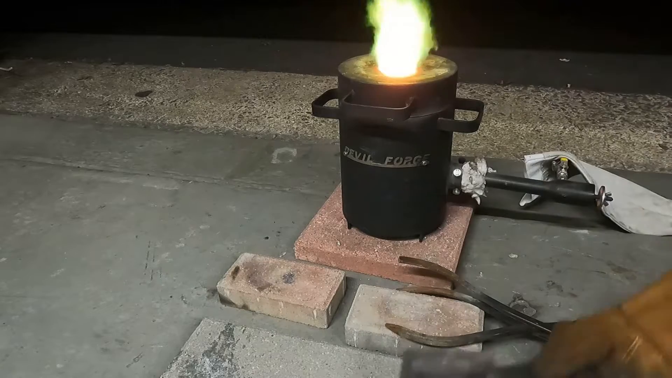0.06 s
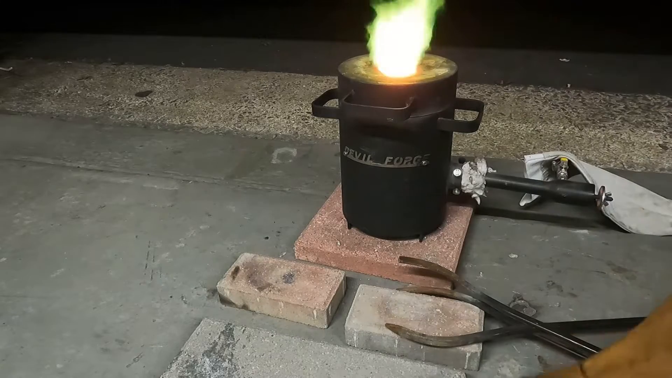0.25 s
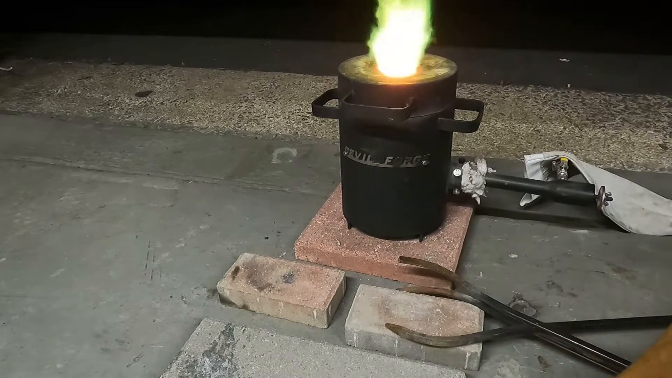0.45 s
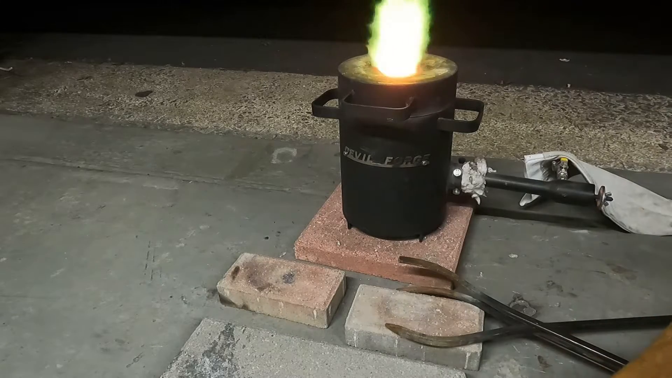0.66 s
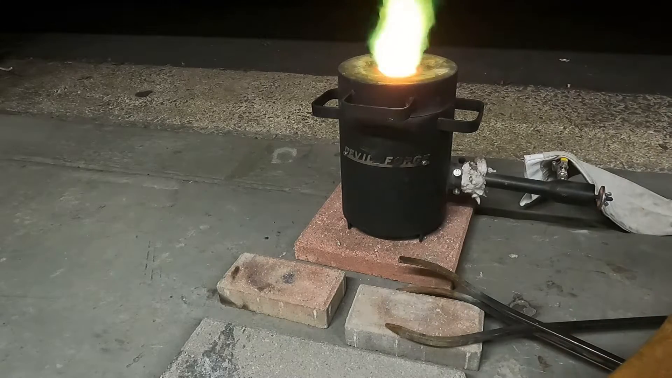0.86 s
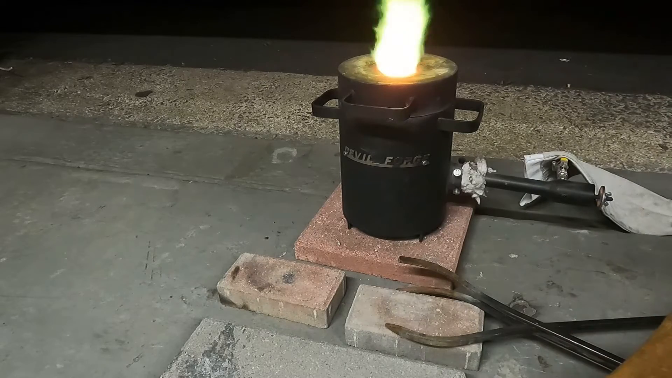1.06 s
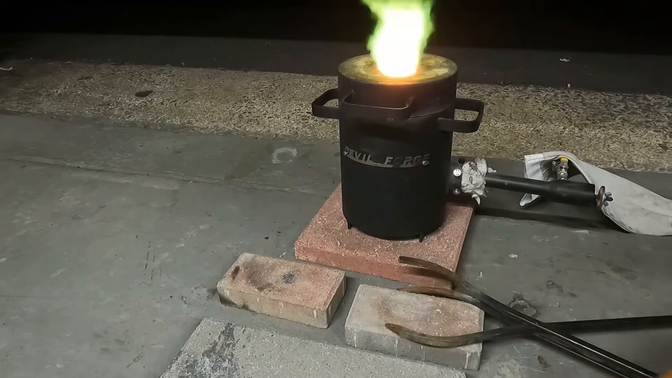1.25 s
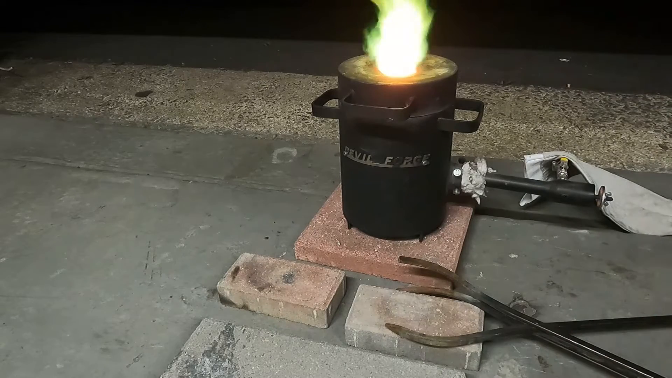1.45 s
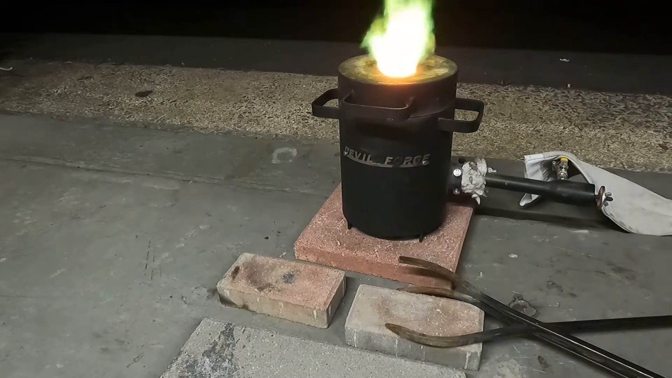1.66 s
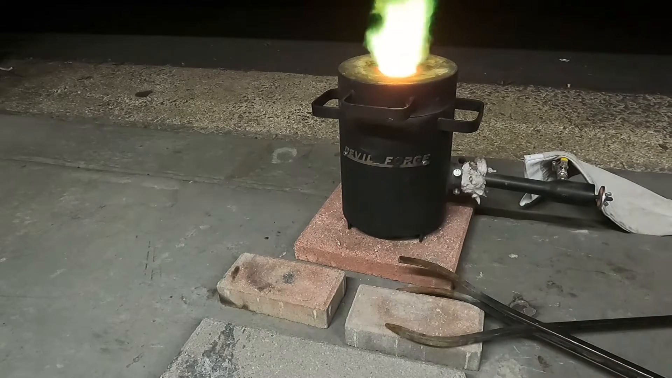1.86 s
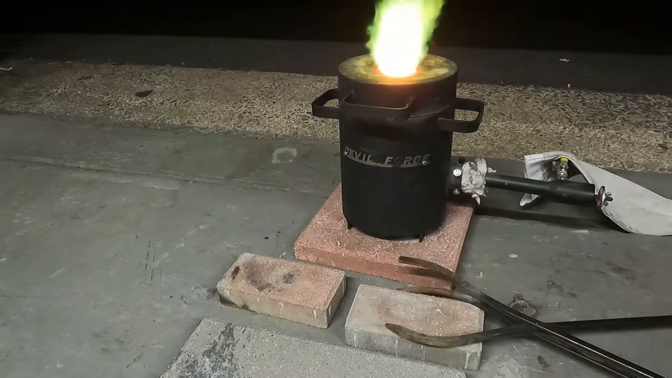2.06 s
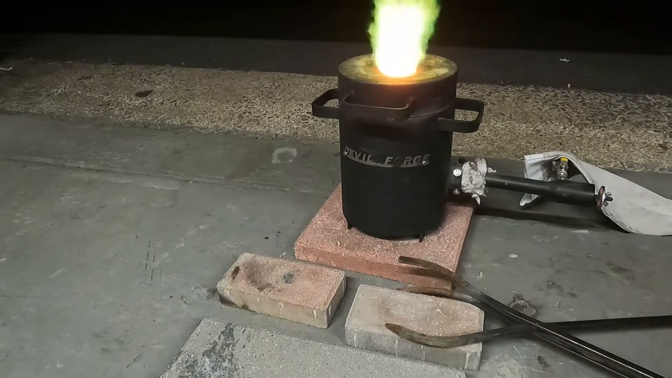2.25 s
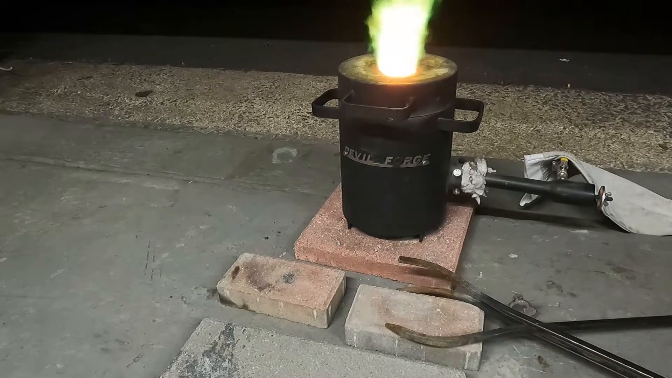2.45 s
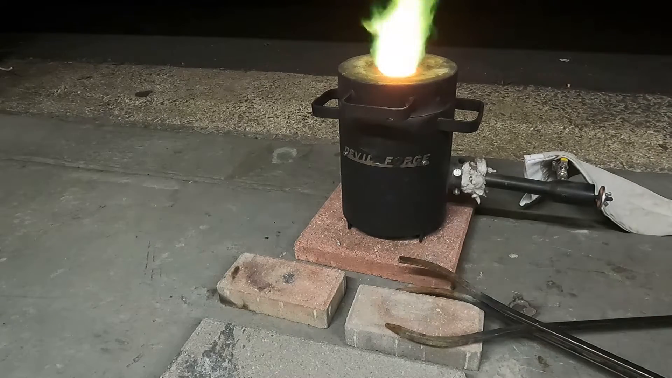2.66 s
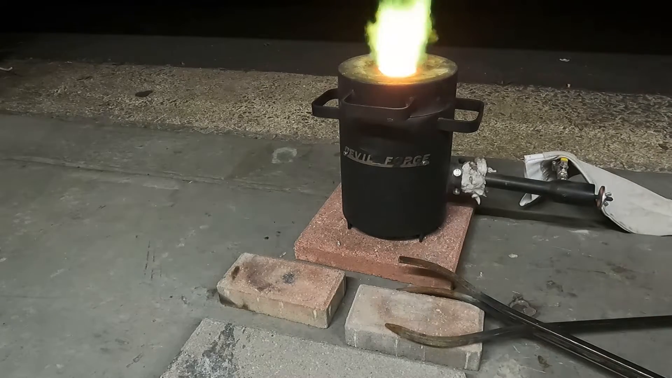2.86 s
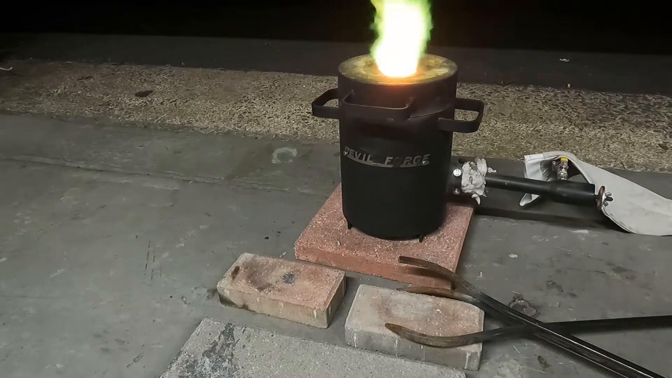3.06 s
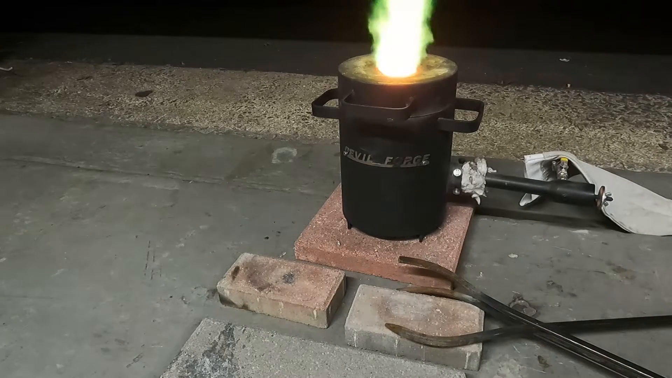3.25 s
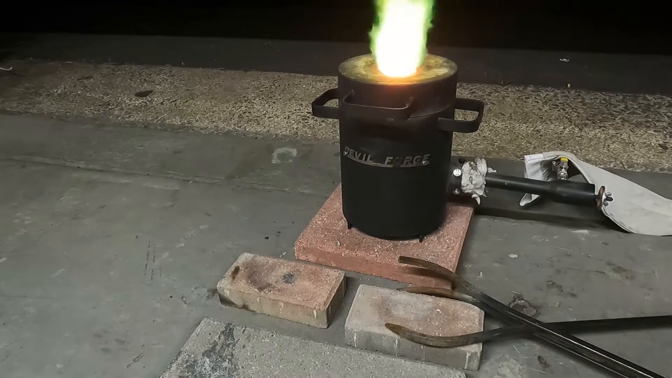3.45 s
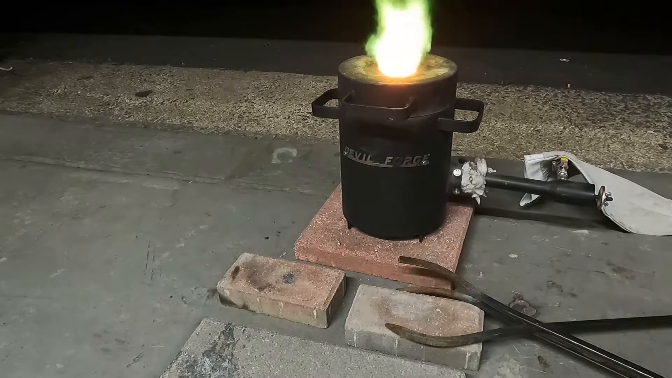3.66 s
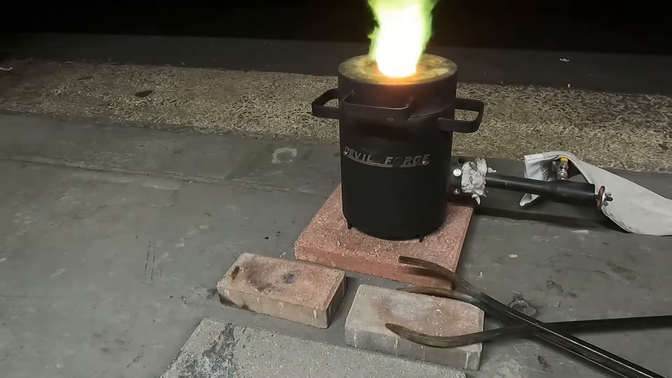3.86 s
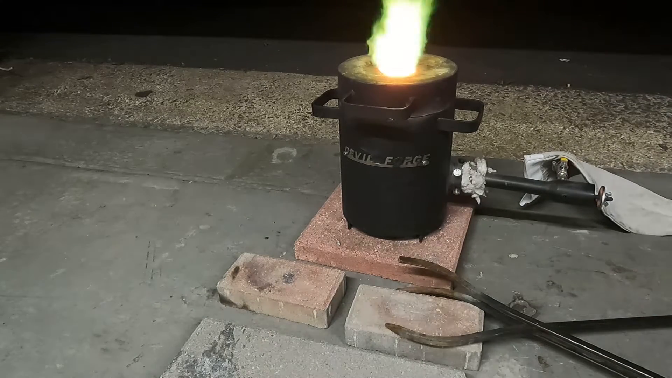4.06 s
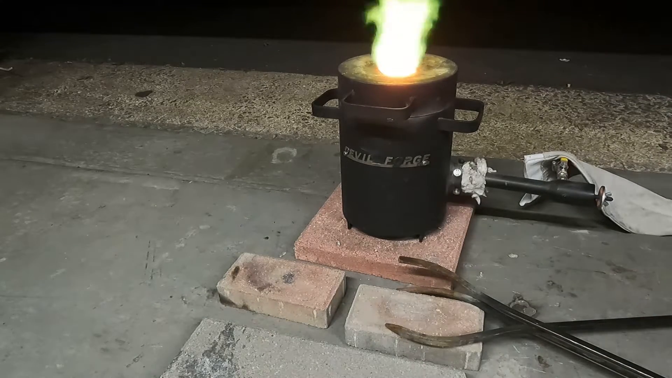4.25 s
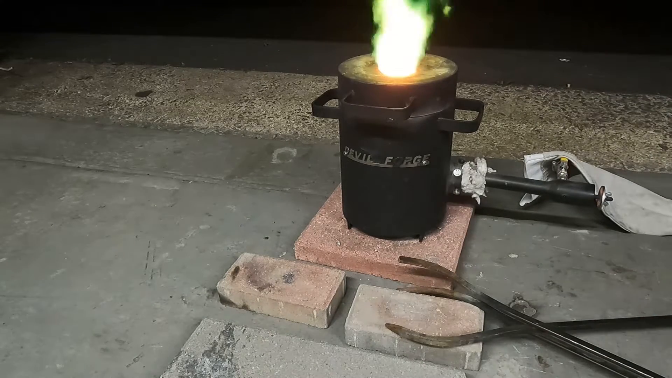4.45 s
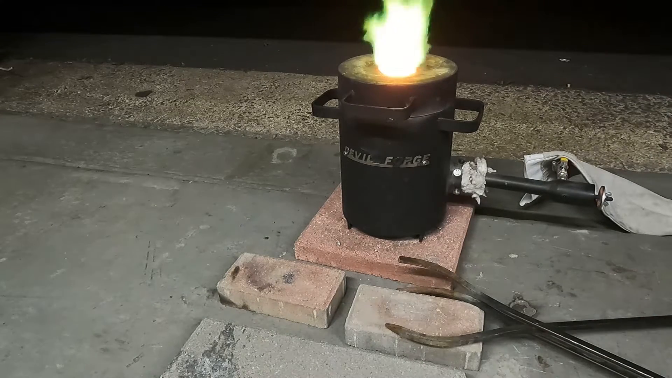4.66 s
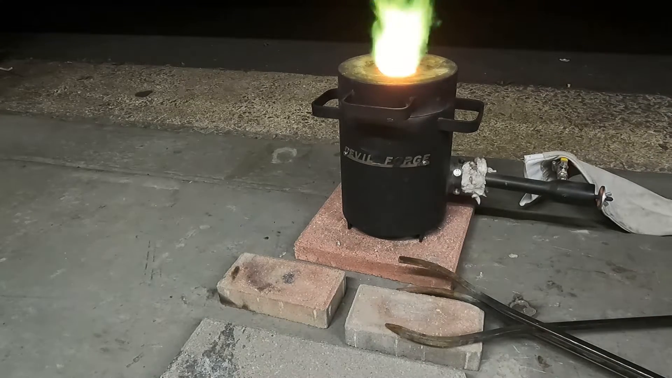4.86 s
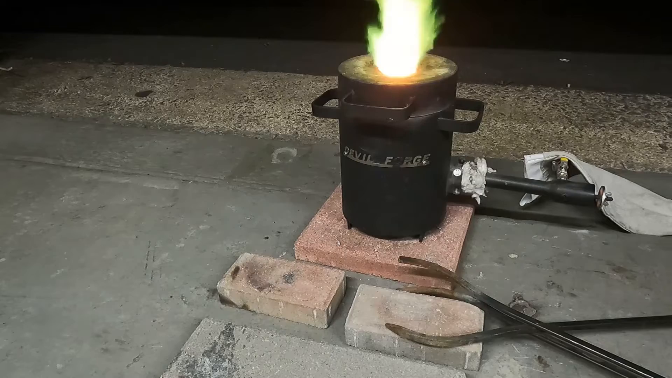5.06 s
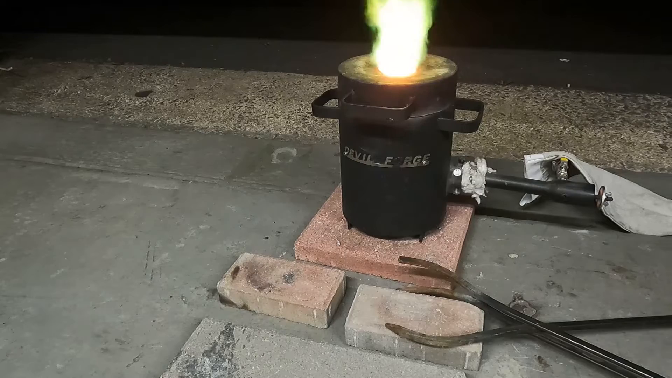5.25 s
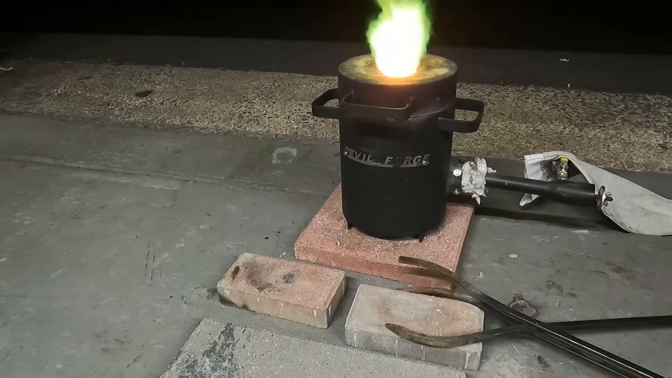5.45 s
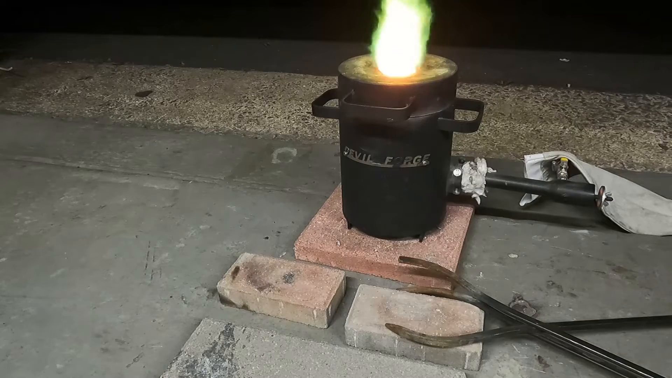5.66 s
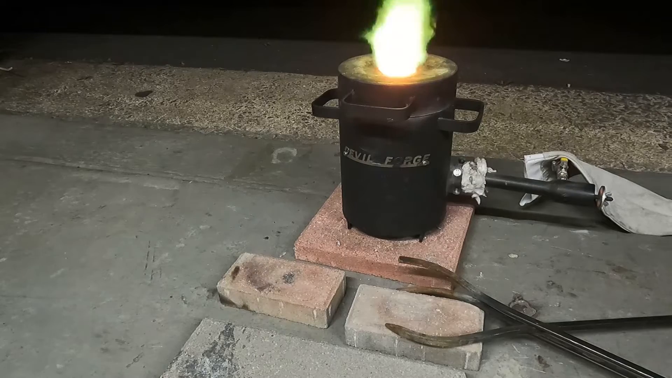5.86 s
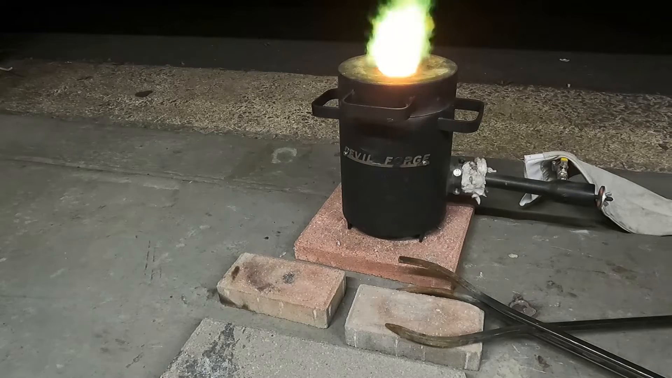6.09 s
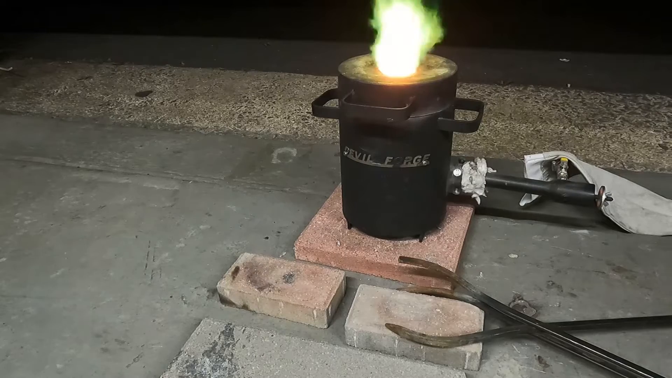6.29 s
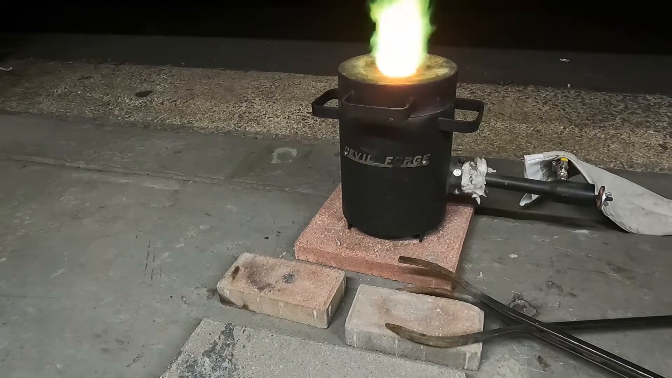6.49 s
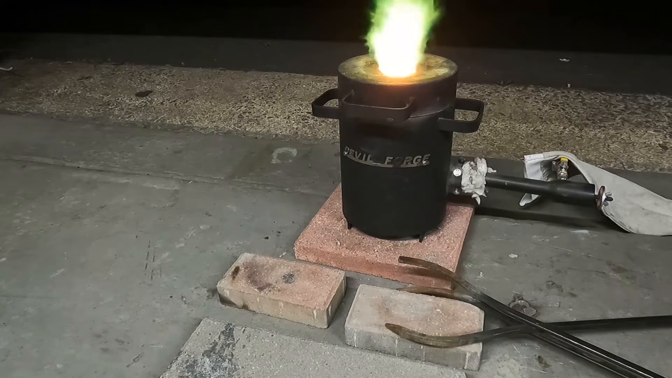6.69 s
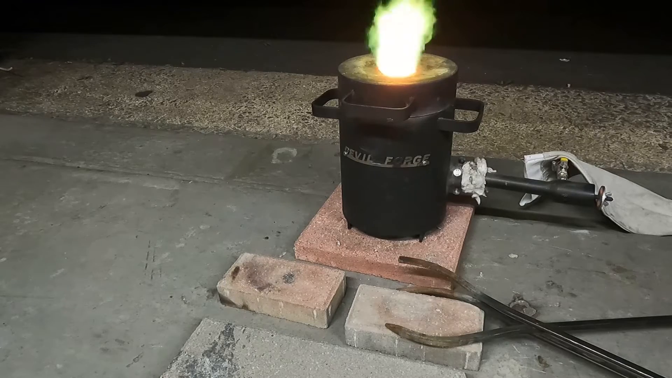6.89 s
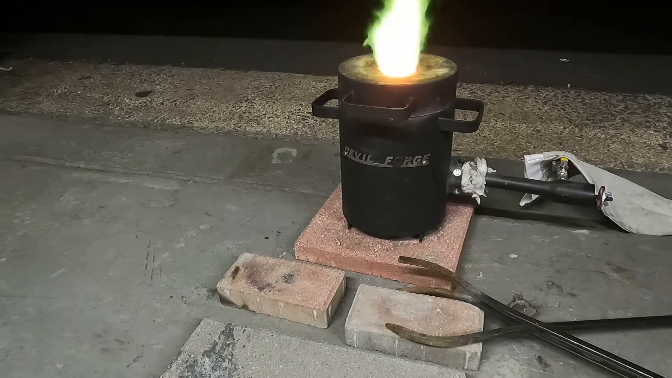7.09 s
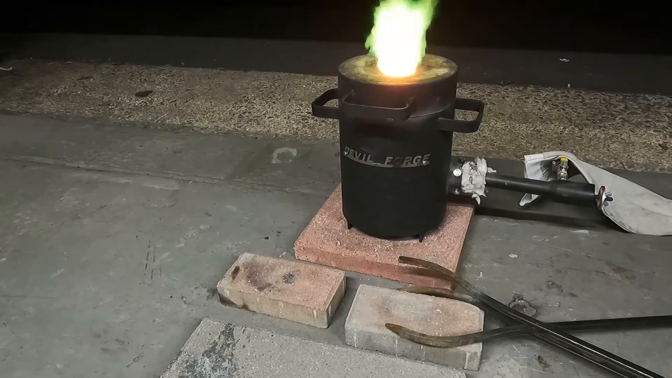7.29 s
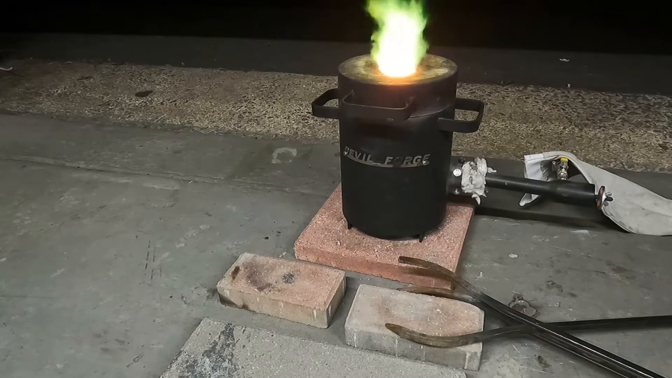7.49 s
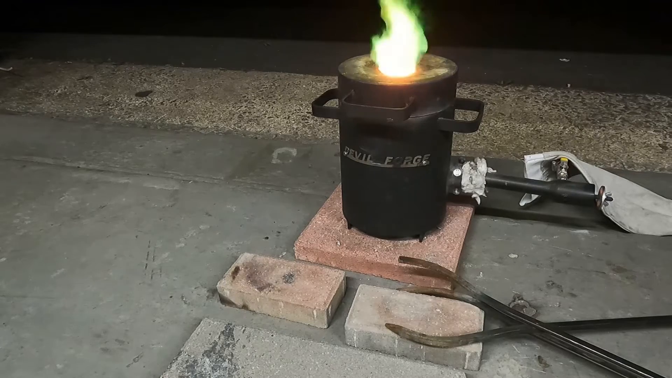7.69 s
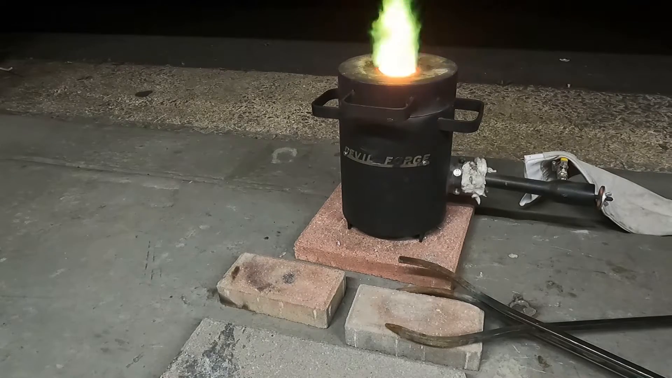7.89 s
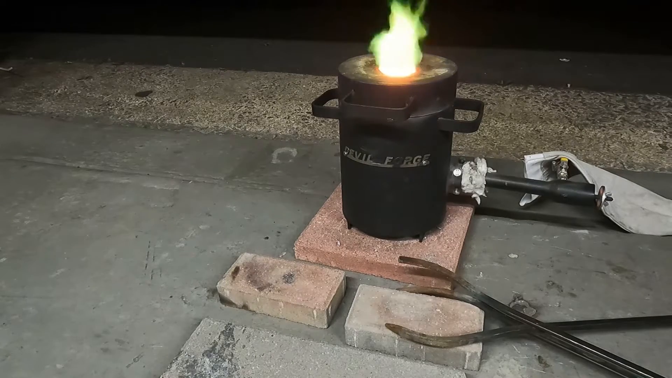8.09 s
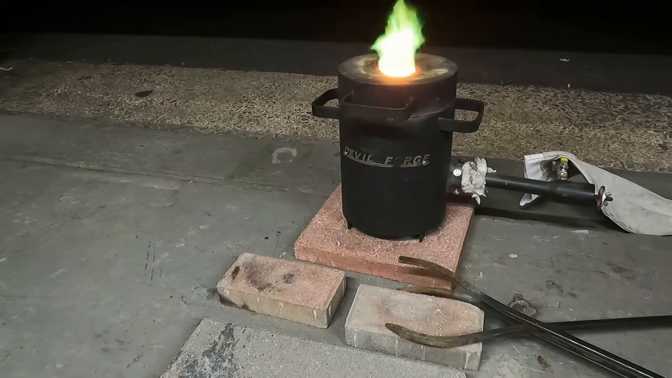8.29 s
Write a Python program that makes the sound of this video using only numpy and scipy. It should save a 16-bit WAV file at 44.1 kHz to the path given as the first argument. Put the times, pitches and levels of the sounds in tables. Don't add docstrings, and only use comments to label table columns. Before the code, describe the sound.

Low, booming gas-flame roar with faint hiss outdoors; a quick metallic knock at half a second, and the flame sinks in the last second.

```python
import sys
import numpy as np
from scipy import signal
from scipy.fft import rfft, irfft, next_fast_len
from scipy.io import wavfile
from scipy.ndimage import uniform_filter1d, minimum_filter1d, map_coordinates

SR = 44100
rng = np.random.default_rng(int(sys.argv[2]) if len(sys.argv) > 2 else 0)


def store_pcm(level_fs):
    pcm = np.round(np.clip(level_fs, -1, 1) * 32767).astype(np.int16)
    wavfile.write(sys.argv[1], SR, np.atleast_2d(pcm).T)


def to_linear_factor(level_db):
    exponent = np.asarray(level_db, float) / 20
    return 10 ** exponent


N = 367353

# frequency in Hz, level in dB per Hz.
RUMBLE_COLOUR = [(12, -48), (25, -31), (38, -18.5), (53, -13.5), (75, -6.5), (100, 2), (118, -5.5),
                 (150, -33), (300, -95)]
ROAR_COLOUR = [(60, -71), (100, -36), (130, -2.5), (160, -3), (190, -5.5), (225, -18.5), (300, -69),
               (600, -110)]
BOOM_COLOUR = [(100, -75), (160, -26), (190, -5), (220, 1), (255, 0), (335, -1.5), (365, -12), (450, -39.5),
               (900, -100)]
RUSH_COLOUR = [(200, -66), (330, -16), (380, 0), (450, -2), (600, -6), (800, -11.5), (1100, -14.5),
               (1500, -20.5), (1800, -25), (2000, -46), (2600, -74), (5000, -120)]
HISS_COLOUR = [(1120, -37), (1900, -9), (2000, -8), (2480, 0), (3040, -1), (3280, -10.5), (3940, -9),
               (4510, -0.5), (5150, -12.5), (5420, -15.5), (7030, -9), (8450, -20), (10000, -20),
               (11900, -18.5), (14100, -31)]
# centre in Hz, width in Hz, peak (or dip, if negative) in dB.
CHAMBER_MODES = [(119, 14, -4), (146, 14, 4), (170, 20, 4), (213, 14, -3), (259, 14, 3), (277, 16, -5),
                 (293, 14, 2), (308, 12, -2), (354, 12, -10), (376, 14, 4), (392, 9, -9), (410, 14, 3),
                 (487, 12, -7), (503, 12, 3), (514, 8, -4), (543, 12, -4), (559, 14, -6), (584, 20, 2),
                 (614, 12, 2), (666, 14, -7), (687, 10, -5), (747, 30, 3), (798, 30, -4), (917, 14, 4),
                 (935, 14, -4), (1190, 20, -4), (1264, 20, 5), (1317, 16, -5)]
TUBE_MODES = [(1990, 100, -4.5), (2453, 80, 5), (2730, 100, -3), (3580, 79, 7), (5075, 110, 5.5),
              (5100, 61, 6), (5280, 200, 6.5), (5720, 36, 8.5), (5930, 200, 6.5), (6710, 190, -6),
              (7700, 200, 2), (9000, 200, -1), (9800, 80, 7.5), (10010, 120, 6), (10600, 220, 2.5),
              (12200, 300, 1), (13500, 150, -8)]
# start in seconds, peak level in dB.
TOOL_CLICKS = [
    (.5353, -10),
]
# frequency in Hz, level in dB, time to fall 60 dB in seconds.
TOOL_MODES = [(880, -4, .022), (1150, -4, .016), (2300, -7, .018), (2900, -20, .01), (3560, -21, .035),
              (4310, -21, .015)]
# frequency in Hz, likeness from 0 to 1.
LIKENESS = [(125, 1), (250, 0.99), (500, 0.97), (1000, 0.95), (2000, 0.8), (3000, .74), (6000, 0.59),
            (10000, 0.28), (13600, .1)]
# frequency in Hz, lead of the left in radians.
LEFT_LEAD = [(30, 0), (60, -.04), (150, -.08), (400, -.15), (1290, -.4), (1980, -.5), (3010, -.8),
             (3700, -.6), (5430, -.2), (7840, -.1), (13800, 0)]
# frequency in Hz, left minus right in dB.
LEFT_TILT = [(200, 0), (670, -1), (1220, -1), (2240, -2.5), (4090, -1), (7470, -2.5), (13600, 3)]
# time in seconds, gas flow in dB.
GAS_FLOW = [
    (0, -32),
    (.6, -31),
    (3, -31.5),
    (6.3, -31.5),
    (7, -32),
    (7.35, -33.5),
    (7.7, -37),
    (8, -38),
    (8.33, -39),
]
# time in seconds, tip toward the upper chamber in dB.
FLAME_SEAT = [(0, 1), (.4, -2.5), (.8, -0.5), (1.25, -1), (1.5, 0.5), (1.85, -2.5), (1.96, 0.5), (2.3, -3),
              (2.7, 1), (3, -2), (3.6, 1.5), (4, -3), (4.7, 3), (5.2, -1.5), (5.7, 2), (6.5, 1), (7.3, 0),
              (8.33, 1)]
# frequency in Hz, readiness to stay wide in spreads.
WIDTH_KEPT = [(3000, 1.6), (5000, .7), (7500, -.2), (9500, -1.1), (11000, -1), (12000, -.1), (13000, -1.3)]

FULL_FLOW_DB = -31.5
RUMBLE_DB, RUMBLE_FOLLOWS = -27.5, 0.1
ROAR_DB, ROAR_FOLLOWS = -18, 0.57
BOOM_DB, BOOM_FOLLOWS = -17.5, 0.81
FLUTTER_S, FLUTTER_RISE_S, FLUTTER_DB = 8.1, 0.051, 4


def unit(x):
    return x / np.sqrt(np.mean(x ** 2) + 1e-20)


def along(points, hz):
    point_hz, values = np.transpose(points)
    return np.interp(np.log(hz + 1), np.log(point_hz + 1), values)


def wobble(rate_hz):
    knots = rng.standard_normal(int(N * rate_hz / SR) + 4)
    return map_coordinates(knots, [np.arange(N) * rate_hz / SR])


def filtered(x, response):
    size = next_fast_len(N + SR // 2)
    hz = np.fft.rfftfreq(size, 1 / SR)
    return irfft(rfft(x, size) * response(hz), size)[..., :N]


def resonances(modes, hz):
    return sum(db / (1 + (2 * (hz - centre_hz) / width_hz) ** 2) for centre_hz, width_hz, db in modes)


def walls(x):
    t = np.arange(SR // 10) / SR
    echoes = rng.standard_normal(len(t)) * to_linear_factor(-60 * t / 0.3) * (t > 0.004)
    echoes = to_linear_factor(-8.0) * echoes / np.linalg.norm(echoes)
    reflected = signal.fftconvolve(x, echoes[None], axes=1)[:, :N]

    def treble(hz):
        return hz ** 2 / (hz ** 2 + 900 ** 2) / (1 + hz / 6000)

    return x + filtered(reflected, treble)


def tool():
    out = np.zeros(N + SR)
    t = np.arange(SR // 4) / SR
    for start_s, peak_db in TOOL_CLICKS:
        pitch_hz = 2100 - 1000 * np.exp(-(t / 0.0018) ** 2)
        knock = to_linear_factor(-60 * t / 0.014) * np.sin(2 * np.pi * np.cumsum(pitch_hz) / SR)
        ring = sum(to_linear_factor(db - 60 * t / t60) * np.sin(2 * np.pi * hz * t) for hz, db, t60 in TOOL_MODES)
        blow = -(knock + ring) * (1 - np.exp(-t / 0.0008))
        yard = rng.standard_normal(len(t)) * to_linear_factor(-38 - 60 * t / 0.28) * (t > 0.004)
        answer = signal.fftconvolve(blow, yard)[:len(t)]
        out[round(start_s * SR):][:len(t)] += to_linear_factor(peak_db + 1) * (blow + answer)
    return out[:N]


def turbulence(spectrum, modes, patchy_db):
    noise = signal.stft(rng.standard_normal((2, N + 512)), nperseg=512)[2]
    patches = uniform_filter1d(rng.standard_normal(noise.shape[1:]), size=6, axis=0)
    patches = unit(uniform_filter1d(patches, size=8, axis=1))
    pair = signal.istft(noise * to_linear_factor(patchy_db * patches), nperseg=512)[1][:, :N]

    def middle_and_side(hz):
        colour = to_linear_factor(along(spectrum, hz) + resonances(modes, hz))
        turn = np.arccos(np.clip(along(LIKENESS, hz), -1, 1)) / 2
        return colour * np.array([np.cos(turn), np.sin(turn)])

    mid, side = filtered(pair, middle_and_side)
    return unit(np.array([mid + side, mid - side]))


def burner():
    t = np.arange(N) / SR
    gas_db = np.interp(t, *np.transpose(GAS_FLOW))
    lost_db = gas_db - FULL_FLOW_DB
    flutter_db = FLUTTER_DB / (1 + np.exp((FLUTTER_S - t) / FLUTTER_RISE_S))
    tip_db = np.interp(t, *np.transpose(FLAME_SEAT))
    flicker = wobble(14)

    rumble_db = RUMBLE_DB + RUMBLE_FOLLOWS * lost_db + flutter_db
    roar_db = ROAR_DB + ROAR_FOLLOWS * lost_db - 0.66 * tip_db
    boom_db = BOOM_DB + BOOM_FOLLOWS * lost_db + tip_db
    rush_db = gas_db + 5.0 + 0.4 * flicker
    hiss_db = gas_db - 14.5 + 0.17 * flicker + 0.14 * wobble(35)

    rumble = to_linear_factor(rumble_db) * turbulence(RUMBLE_COLOUR, CHAMBER_MODES, patchy_db=-0.3)
    roar = to_linear_factor(roar_db) * turbulence(ROAR_COLOUR, CHAMBER_MODES, patchy_db=-0.27)
    boom = to_linear_factor(boom_db) * turbulence(BOOM_COLOUR, CHAMBER_MODES, patchy_db=0.03)
    rush = to_linear_factor(rush_db) * turbulence(RUSH_COLOUR, CHAMBER_MODES, patchy_db=-0.31)
    hiss = to_linear_factor(hiss_db) * turbulence(HISS_COLOUR, TUBE_MODES, patchy_db=0.72)
    return rumble + roar + boom + rush + hiss


def scene():
    half = np.array([[0.5], [-0.5]])

    def microphones(hz):
        return to_linear_factor(half * along(LEFT_TILT, hz)) * np.exp(1j * half * along(LEFT_LEAD, hz))

    return filtered(walls(burner()), microphones) + tool()


def narrowed(x):
    mid, side = (x[0] + x[1]) / 2, (x[0] - x[1]) / 2
    hz, t, z = signal.stft(side, SR, nperseg=2048)
    bands = rng.standard_normal((len(hz) // 16 + 1, len(t)))
    bands = np.repeat(bands, 16, axis=0)[:len(hz)]
    moments = 0.8 * rng.standard_normal(len(t))
    chance = unit(uniform_filter1d(bands + moments, size=2, axis=1))
    stays_wide = chance + along(WIDTH_KEPT, hz)[:, None] > 0
    side = signal.istft(z * stays_wide, nperseg=2048)[1][:N]
    return np.array([mid + side, mid - side])


def top_cut(x):
    return signal.sosfilt(signal.butter(12, 14250, fs=SR, output="sos"), x)


def record(dry):
    power = np.mean(dry ** 2, axis=0)
    swell = np.abs(uniform_filter1d(uniform_filter1d(power, size=500), size=500))
    squeezed = to_linear_factor(1.0) * dry * np.maximum(swell / 0.031, 1) ** -0.2
    ceiling = 0.635
    need = np.minimum(1, ceiling / (np.abs(squeezed).max(axis=0) + 1e-9))
    gain = uniform_filter1d(minimum_filter1d(need, size=301), size=301)
    mix = narrowed(squeezed * gain)
    return top_cut(mix)


dry = scene()
out = record(dry)
store_pcm(out)
```